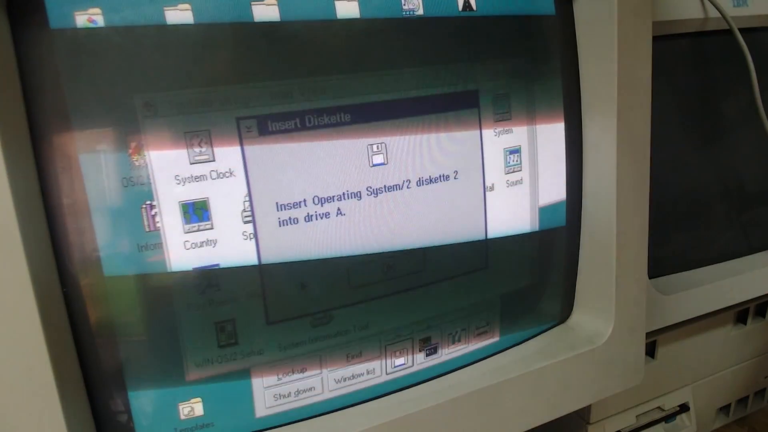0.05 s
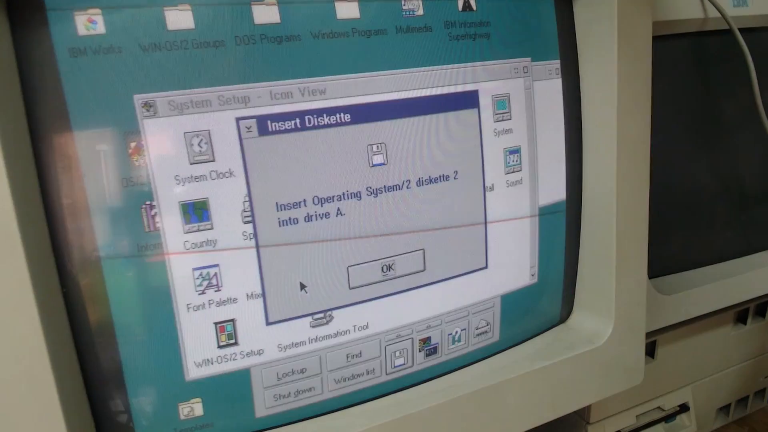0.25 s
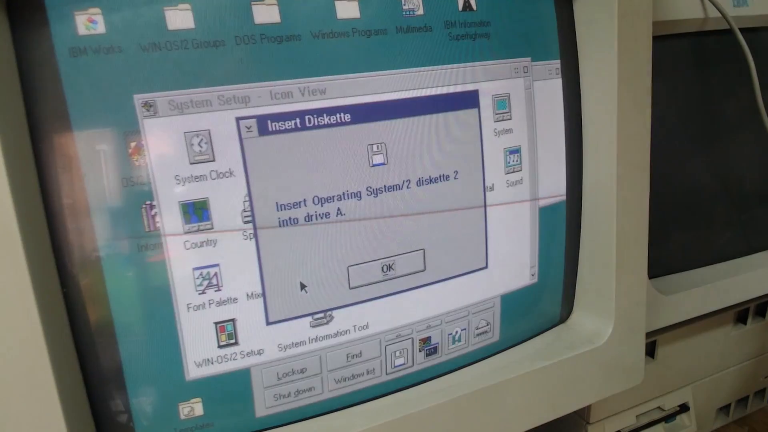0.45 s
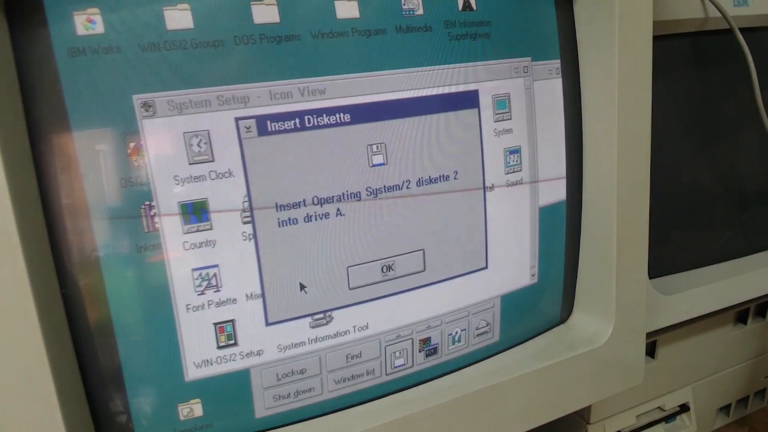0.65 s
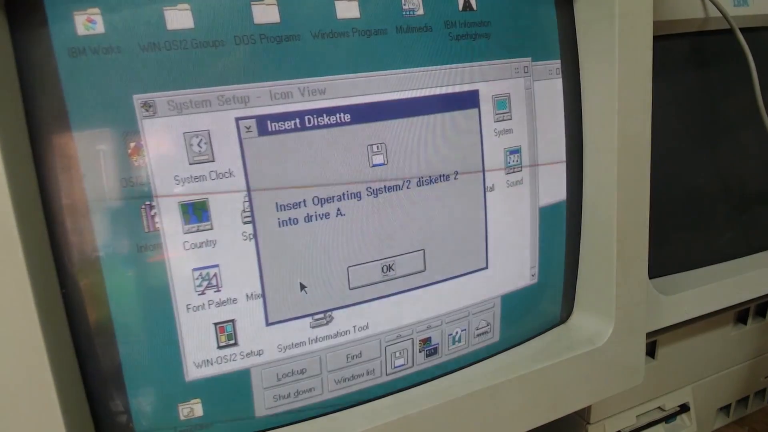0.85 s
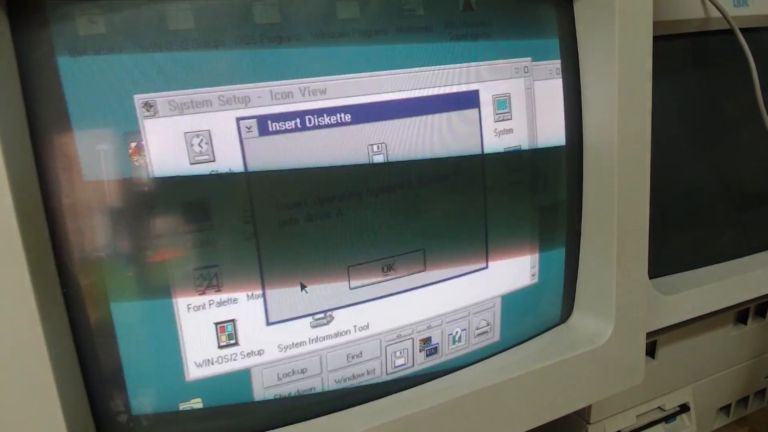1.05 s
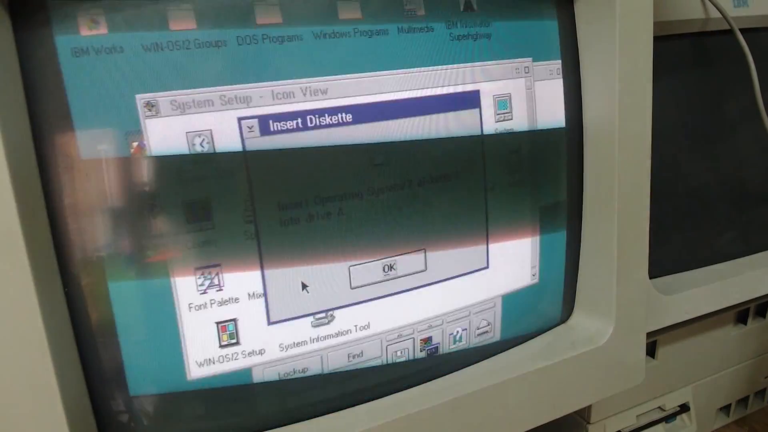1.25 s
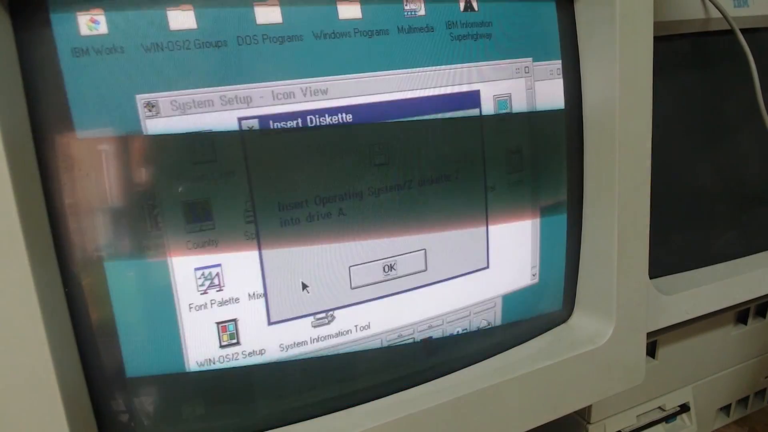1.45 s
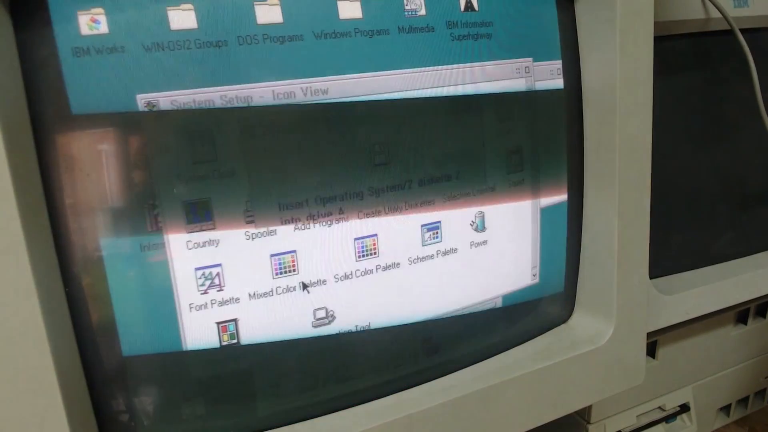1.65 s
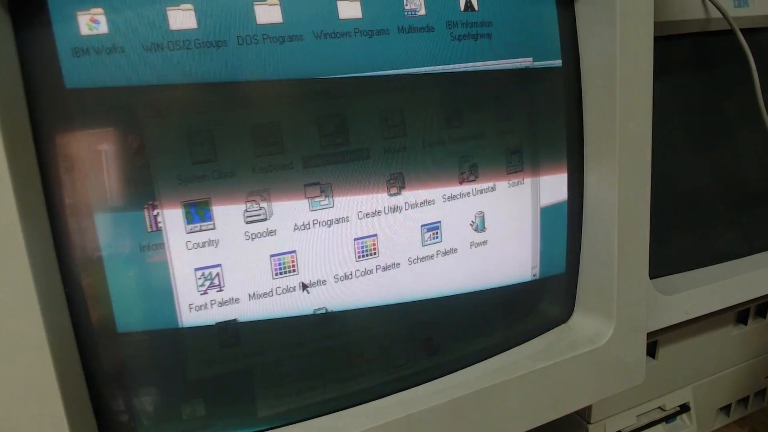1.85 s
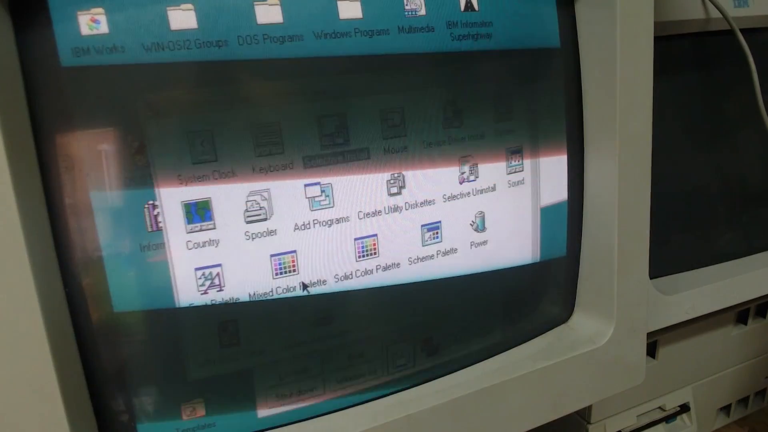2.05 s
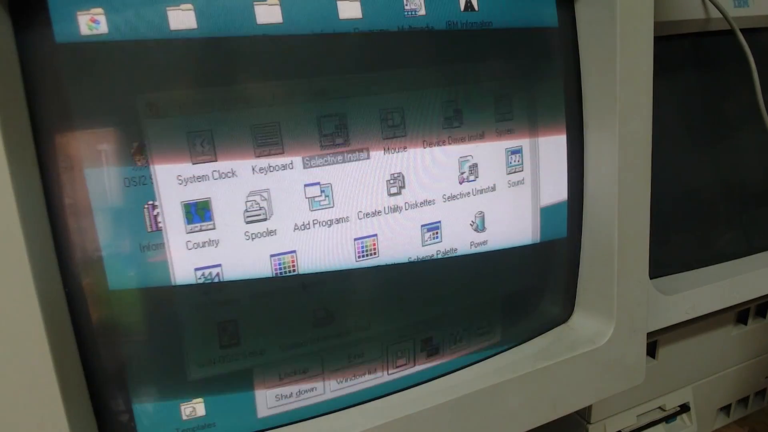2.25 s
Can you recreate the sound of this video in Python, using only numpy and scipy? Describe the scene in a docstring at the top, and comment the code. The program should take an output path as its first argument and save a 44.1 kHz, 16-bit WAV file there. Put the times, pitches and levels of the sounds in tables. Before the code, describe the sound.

Floppy disk springs from a computer drive, slides out and is handled over faint whine and hiss

```python
"""A computer whines as a bundle of wavering sine tones, and its fan hisses as filtered noise, throughout.
A floppy disk springs from the drive: bursts of noise strike in quick turn and set the case ringing.
Soft rubs of gliding, narrow noise come and go. The disk scrapes out of the slot as dense tiny slips.
Then plastic ticks (short noise bursts) and grainy rustling are heard as it is handled and swapped.
The blows, the scrape and the ticks echo in a small room; one microphone hears everything."""
import sys
import numpy as np
from scipy import signal
from scipy.fft import rfft, irfft
from scipy.io import wavfile

SR = 44100
rng = np.random.default_rng(int(sys.argv[2]) if len(sys.argv) > 2 else 0)


def master(y):
    """Save y as 16-bit WAV."""
    cut = np.clip(np.atleast_2d(y).T, -1, 1)
    pcm = np.round(cut * 32767)  # scale
    wavfile.write(sys.argv[1], SR, pcm.astype(np.int16))


N = 101430
T = np.arange(N) / SR


def from_db(db):
    """Turn decibels into a gain."""
    return 10 ** (np.asarray(db) / 20)


def rms_one(x):
    """Scale a signal to an average power of 1."""
    return x / np.sqrt(np.mean(x ** 2) + 1e-20)


def curve(rows):
    """Join (time, value) rows by straight lines."""
    return np.interp(T, *np.transpose(rows))


def drift(hz):
    """Random wandering with spread 1, slower for a lower hz."""
    f = np.arange(N // 2 + 1) * SR / N
    spectrum = rfft(rng.standard_normal(N)) / (1 + (f / hz) ** 2)
    return rms_one(irfft(spectrum, N))


def colour(x, points, size=4096):
    """Filter a sound to follow (frequency, level) points, with no sound before its cause."""
    hz, db = np.transpose(points)
    f = np.maximum(np.arange(size // 2 + 1) * SR / size, 1)
    gain = from_db(np.interp(np.log(f), np.log(hz), db))
    # folding the cepstrum forward in time gives the filter its earliest possible response
    cepstrum = irfft(np.log(gain))
    cepstrum[1:size // 2] *= 2
    cepstrum[size // 2 + 1:] = 0
    response = irfft(np.exp(rfft(cepstrum)))
    return signal.fftconvolve(x, response)[:len(x)]


def low_pass(hz):
    """Make a gentle filter that keeps what lies below hz."""
    return signal.butter(2, hz, fs=SR, output="sos")


def high_pass(x, hz):
    """Gently remove what lies below hz."""
    return signal.sosfilt(signal.butter(2, hz, "high", fs=SR, output="sos"), x)


def ring(clicks, hz, t60):
    """A resonator: each click starts a sine that falls by 60 dB in t60 seconds."""
    r = np.exp(-np.log(1000) / (t60 * SR))
    w = 2 * np.pi * hz / SR
    return signal.lfilter([0, np.sin(w)], [1, -2 * r * np.cos(w), r * r], clicks + 1e-18)


def contacts(rows, tone_hz, snap, attack_s, ring_db, ring_q, size=6000):
    """Each contact is a snap and a dying rattle, with a tone and a resonance of its own."""
    out = np.zeros(N + size)
    t = T[:size]
    for s, *tone_db, decay, ring_hz in rows:
        hit = rng.standard_normal(size) * np.exp(-t / decay) * (1 - np.exp(-t / attack_s))
        hit /= np.linalg.norm(hit)
        hit[0] = snap   # one sharp first sample
        hit /= np.linalg.norm(hit)
        hit += from_db(ring_db) * signal.lfilter(*signal.iirpeak(ring_hz, ring_q, fs=SR), hit)
        start = int(s * SR)
        out[start:start + size] += colour(hit, list(zip(tone_hz, tone_db)))
    return out[:N]


ROOM_T60_S, ROOM_DELAY_S = 0.19, 0.0024   # time to fall by 60 dB, time to build up


def room(x, size=22000):
    """Echoes of a small room: noise that builds up quickly and dies away."""
    t = T[:size]
    build_up = 1 - np.exp(-(t / ROOM_DELAY_S) ** 2)
    tail = rng.standard_normal(size) * np.exp(-np.log(1000) * t / ROOM_T60_S) * build_up
    return signal.fftconvolve(x, tail / np.linalg.norm(tail))[:N]


# steady tones of the hard disk: (frequency [Hz], relative level [dB])
WHINE = [(1814, -70.5), (1941, -71.5), (2263, -70.5), (2541, -75.5), (2632, -68.5), (2864, -63),
         (3236, -69.5), (3280, -59), (3558, -72.5), (3838, -72), (4253, -72.5), (4527, -71.5),
         (5222, -73.5), (6422, -79.5), (6794, -71.5), (8086, -83), (9001, -74), (10799, -77.5),
         (11700, -81.5)]
WHINE_DB, WHINE_JITTER_HZ, WHINE_WAVER_DB = -1.5, 1.51, 1.0
# how strongly the main whine throbs once a turn: (time [s], relative level [dB])
THROB = [(0, -75), (.48, -69), (.545, -57), (.59, -66.5), (1.09, -69.5), (1.16, -46.5), (1.2, -70),
         (1.42, -65), (1.51, -52), (1.56, -63.5), (1.72, -55), (2.3, -76)]
TURNS_HZ, THROB_PEAK_S = 45.3, 1.146   # turns per second, time of one throb's peak
THROB_WAVER_DB, THROB_ROUGH, THROB_FLUTTER_HZ = 2, .4, 130
MAIN_WHINE_HZ, MAIN_WHINE_DB = 2956, -60.5
# a lower whine swells once
SWELL_S, SWELL_LENGTH_S, SWELL_HZ, SWELL_DB = 1.25, 0.24, 1650, -61
# a high whine flares with the last blow of the eject and fades back
HIGH_WHINE_HZ, HIGH_WHINE_DB, FLARE_DB, FLARE_T60_S = 7071, -71.5, -55.5, .9
# tone of the fan's hiss: (frequency [Hz], relative level [dB])
FAN = [(25, -3), (100, -20), (190, -8), (400, -5), (650, -9), (1150, -8), (1600, -12.5), (2200, -13.5),
       (3100, -13.5), (4000, -17), (7300, -15.5), (11000, -25.5), (15500, -35.5)]
FAN_DB = -60


def computer():
    """Wavering whine of the hard disk, fluttering unevenly with its rotation, over the fan's hiss."""
    def phase(hz):
        wobbly_hz = hz + WHINE_JITTER_HZ * drift(23.0)
        return 2 * np.pi * (rng.random() + np.cumsum(wobbly_hz) / SR)

    whine = np.zeros(N)
    for hz, db in WHINE:
        level_db = WHINE_DB + db + WHINE_WAVER_DB * drift(6.4)
        whine += from_db(level_db) * np.sin(phase(hz))

    turn = 2 * np.pi * TURNS_HZ * (T - THROB_PEAK_S)
    main = phase(MAIN_WHINE_HZ)
    rasp = drift(THROB_FLUTTER_HZ) * np.sin(main) + drift(THROB_FLUTTER_HZ) * np.cos(main)
    throb_gain = from_db(curve(THROB) + THROB_WAVER_DB * drift(9.2)) * (1 + np.cos(turn))
    whine += from_db(MAIN_WHINE_DB) * np.sin(main)
    whine += throb_gain * (np.sin(main - turn) + THROB_ROUGH * rasp)

    swell = np.exp(-((T - SWELL_S) / SWELL_LENGTH_S) ** 2)
    whine += from_db(SWELL_DB) * swell * np.sin(phase(SWELL_HZ))

    since = T - BLOWS[-1][0]
    fade = (since > 0) * np.exp(-np.log(1000) * np.abs(since) / FLARE_T60_S)
    high_gain = from_db(HIGH_WHINE_DB) + from_db(FLARE_DB) * fade
    whine += high_gain * np.sin(phase(HIGH_WHINE_HZ))

    hiss = rms_one(colour(rng.standard_normal(N), FAN))
    return np.sqrt(2) * whine + from_db(FAN_DB) * hiss   # root 2: sine levels become rms levels


# where the bass, mid, presence and treble levels of a blow apply: (frequency [Hz], ...)
TONE_HZ = (350, 1300, 3800, 10000)
# blows of the eject mechanism: (time [s], bass level [dB], mid level [dB], presence level [dB],
# treble level [dB], rattle decay [s], resonance [Hz]); levels are relative
BLOWS = [(0.2133, -26, -21, -17, -22, 0.0033, 5240), (0.2152, -6.5, -7.5, -3, -4, 0.0035, 1570),
         (0.2185, 5, -1, -4, -16, 0.004, 1060), (0.2707, -3.5, 2, 3, -7, 0.011, 1410),
         (0.2788, -13, -22, -16, -17, 0.019, 1690), (0.3004, -19, -10, -14.5, -22, 0.008, 610),
         (0.3101, -16, -5.5, -2, -27, 0.01, 4320), (0.3215, -17.5, -2, -5, -4.5, 0.0016, 8600)]
# tone shared by all the blows: (frequency [Hz], relative level [dB])
MECHANISM = [(59, -52), (140, -24), (264, -1), (370, -4.5), (600, -2.5), (680, -13), (898, -4.5),
             (1290, -5.5), (1840, -4), (3050, -11), (4020, -7), (4750, -8), (9740, -12.5), (15500, -22)]
# the drive's frame and the case ring: (frequency [Hz], relative level [dB], time to fall by 60 dB [s])
CASE = [(260, -31.5, 0.18), (398, -32.5, 0.13), (496, -30.5, 0.17), (624, -31.5, 0.23), (1120, -50, 0.31),
        (1326, -47, 0.21), (1400, -41, 0.1), (1504, -25, 0.14), (1686, -42, 0.098), (2250, -32, 0.15),
        (3980, -32, 0.11)]
BLOW_DB, CASE_DB, EJECT_ROOM_DB = 20, -6, -5.5
BLOW_SNAP, BLOW_ATTACK_S, BLOW_RING_DB, BLOW_RING_Q = 0.18, 0.00067, 1.5, 8.6
BASS_CUT_HZ = 147


def eject():
    """Latch, carriage and shutter strike in turn and set the case ringing."""
    blows = contacts(BLOWS, TONE_HZ, BLOW_SNAP, BLOW_ATTACK_S, BLOW_RING_DB, BLOW_RING_Q)
    clack = from_db(BLOW_DB) * colour(blows, MECHANISM)
    rings = np.zeros(N)
    for hz, db, t60 in CASE:
        clicks = np.zeros(N)
        for s, *tone_db, decay, ring_hz in BLOWS:
            # a blow excites each ring as strongly as its own tone is at that frequency
            blow_db = np.interp(np.log(hz), np.log(TONE_HZ), tone_db)
            clicks[int(s * SR)] = from_db(db + blow_db)
        rings += ring(clicks, hz, t60)
    out = clack + from_db(CASE_DB) * rings + from_db(EJECT_ROOM_DB) * room(clack)
    return high_pass(out, BASS_CUT_HZ)


# soft rubs and squeaks of handling: (time [s], length [s], frequency [Hz], width [Hz],
# level [dB], glide [octaves per s])
RUBS = [(0.489, 0.013, 1160, 300, -55.5, -0.5), (0.538, 0.036, 2750, 350, -54, 2.5),
        (0.797, 0.028, 1720, 400, -57, -0.5), (.824, 0.024, 497, 150, -52, -6.5),
        (1.494, 0.019, 430, 280, -59.5, -4.5), (1.607, 0.026, 4220, 795, -50.5, 1.5),
        (1.977, 0.028, 648, 99, -48.5, -2.5), (1.991, .018, 850, 60, -50, -2),
        (2.028, .03, 1870, 120, -51.5, -4), (2.039, 0.028, 1250, 695, -47.5, 4.5),
        (2.042, 0.034, 338, 80, -50.5, 7.5), (2.068, .022, 640, 100, -52, 3),
        (2.155, 0.022, 390, 109, -56.5, 9), (2.192, 0.13, 1060, 464, -52.5, 0)]


def rubs():
    """Short soft swells of friction, each in one gliding resonance."""
    out = np.zeros(N)
    for s, length, hz, width_hz, db, glide in RUBS:
        nearby = np.clip(T - s, -2 * length, 2 * length)   # the pitch glides only around the rub
        phase = 2 * np.pi * np.cumsum(hz * 2 ** (glide * nearby)) / SR
        # slow noise on a sine and a cosine makes a narrow band of noise
        noise = drift(width_hz / 2) * np.cos(phase) + drift(width_hz / 2) * np.sin(phase)
        swell = np.exp(-2 * ((T - s) / length) ** 2)
        out += from_db(db) * rms_one(noise) * swell
    return out


# friction as the disk slides out: (time [s], middle level [dB], treble level [dB]); levels are relative
SLIDE = [(1.194, -73, -69), (1.214, -48, -95), (1.228, -39.5, -53), (1.254, -39.5, -37.5),
         (1.284, -36, -29.5), (1.32, -39.5, -33.5), (1.355, -42.5, -44.5), (1.406, -42, -48),
         (1.421, -50.5, -85), (1.459, -66, -87)]
# tone of the scrape: (frequency [Hz], relative level [dB])
SCRAPE = [(120, -67), (200, -39), (240, -34), (333, -26), (392, -27), (596, -17), (858, 1), (940, -3),
          (1560, 1), (1910, -5.5), (2850, -4), (3120, -9.5), (3820, -11.5), (4750, -16.5), (8350, -23),
          (15500, -40)]
SLIDE_DB, SLIDE_ROOM_DB, SLIDE_GRAINS_PER_S = -0.5, -7.5, 10000
SLIDE_BRIGHT_HZ = 2740   # where the treble begins


def slide():
    """Dense tiny slips of plastic on the guides, with middle and treble rising and falling separately."""
    s, middle, treble = np.transpose(SLIDE)
    slips = (rng.random(N) < SLIDE_GRAINS_PER_S / SR) * rng.standard_normal(N)
    scrape = rms_one(colour(slips, SCRAPE))
    dull = signal.sosfiltfilt(low_pass(SLIDE_BRIGHT_HZ), scrape)
    bright = scrape - dull
    friction = from_db(np.interp(T, s, middle)) * rms_one(dull)
    friction += from_db(np.interp(T, s, treble)) * rms_one(bright)
    direct = from_db(SLIDE_DB) * friction * ((T > s[0]) & (T < s[-1]))
    return direct + from_db(SLIDE_ROOM_DB) * room(direct)


# where the bass, mid, presence, treble and top levels of a tick apply: (frequency [Hz], ...)
TICK_TONE_HZ = (350, 1500, 3400, 7500, 14000)
# the disk's shell and shutter tick in the hand: (time [s], bass level [dB], mid level [dB],
# presence level [dB], treble level [dB], top level [dB], rattle decay [s], resonance [Hz]); levels are relative
TICKS = [(1.1995, -40, -31, -37, -15.5, -11, 0.0037, 9200), (1.649, 1, -7, -10.5, -19, -16, 0.0047, 880),
         (1.659, 4.5, -9, -21, -13, -19, 0.0049, 880), (1.703, -18, -11, -8.5, -5, -12, 0.005, 2500),
         (1.7095, -12, -3, -7, -3.5, 2, 0.0027, 1620), (1.7255, 15.5, 2, -7, -25, -6, 0.0015, 953),
         (1.793, -2, -12, -7.5, -19, -33, 0.023, 4360), (1.8122, 1.5, -8, -4.5, 1.5, -1, 0.0042, 9100),
         (1.855, -10, -6, 2, -0.5, -15, 0.00029, 3220), (1.8655, -19, -6, -4.5, 8.5, -6, 0.0013, 4500),
         (1.8711, -36, 3.5, -1, -9, 8, 0.0019, 2430), (1.9155, -12, -15, -18, 0.5, 0, 0.0027, 7300),
         (1.945, -25, -10, -1.5, 2, -32, 0.00092, 2880), (1.9497, -17, -4, -6, -1, -13, 0.0015, 2500),
         (1.957, -25, -17, -6, -23, -2, 0.017, 3930), (1.9945, -27, -1, -7, -6, -8, 0.0012, 1640),
         (2.003, 1.5, -11.5, -9, -9, -39, 0.0069, 1660), (2.112, -5, -5.5, -18, 5.5, -14, 0.0026, 1530),
         (2.199, -9, -9.5, -14.5, 3, 4, 0.0027, 1010), (2.2125, -30, -16, -17, 0.5, -10, 0.0051, 4500),
         (2.2832, -16, 0, 5, -11.5, -14, 0.00056, 2930)]
# tone of the plastic shell, for ticks and rustling: (frequency [Hz], relative level [dB])
SHELL = [(100, -29.5), (200, -18.5), (320, -14.5), (600, -16), (760, -3), (930, -0.5), (1300, -1),
         (1700, 1.5), (2900, -3), (3800, -2), (7300, -10.5), (11000, -18.5), (15500, -28)]
TICK_DB, TICK_ROOM_DB = 0.5, -2.5
TICK_SNAP, TICK_ATTACK_S, TICK_RING_DB, TICK_RING_Q = 0.42, .0003, -0.5, 12
DESK_ECHO_S, DESK_ECHO_DB = 0.00145, -4.5


def ticks():
    """Light plastic ticks, each doubled by an inverted echo close by."""
    hits = contacts(TICKS, TICK_TONE_HZ, TICK_SNAP, TICK_ATTACK_S, TICK_RING_DB, TICK_RING_Q)
    direct = from_db(TICK_DB) * colour(hits, SHELL)
    echo = from_db(DESK_ECHO_DB) * np.interp(T - DESK_ECHO_S, T, direct)
    return direct - echo + from_db(TICK_ROOM_DB) * room(direct)


# plastic rustles against the fingers between the ticks: (time [s], level [dB])
RUSTLE = [(1.63, -53), (1.66, -54.5), (1.69, -76), (1.72, -47), (1.78, -52), (1.845, -51.5), (1.88, -42),
          (1.93, -48), (1.97, -46), (2.02, -49), (2.06, -88), (2.3, -50)]
RUSTLE_GRAINS_PER_S, RUSTLE_SPREAD_DB = 3000, 3.5


def rustle():
    """Uneven grains of friction on the disk's shell."""
    size_db = RUSTLE_SPREAD_DB * np.minimum(rng.exponential(1, N), 5)
    sizes = from_db(size_db) * rng.choice([-1, 1], N)
    grains = sizes * (rng.random(N) < RUSTLE_GRAINS_PER_S / SR)
    started = T > RUSTLE[0][0]
    return from_db(curve(RUSTLE)) * started * rms_one(colour(grains, SHELL))


def scene():
    """All sources at one microphone, alike in both channels."""
    mix = computer() + eject() + rubs() + slide() + ticks() + rustle()
    return np.tile(mix, (2, 1))


CUTOFF_HZ = 15900


def record(dry):
    """Cut the highest treble steeply."""
    steep = signal.ellip(10, .2, 70, CUTOFF_HZ, fs=SR, output="sos")   # 0.2 dB ripple, 70 dB cut
    return signal.sosfilt(steep, dry)


dry = scene()
out = record(dry)
master(out)
```